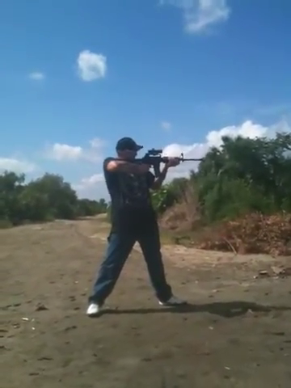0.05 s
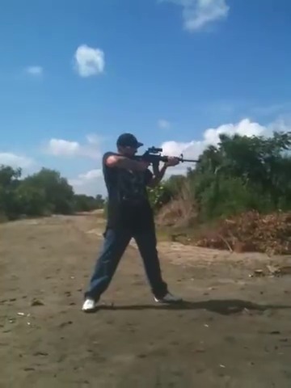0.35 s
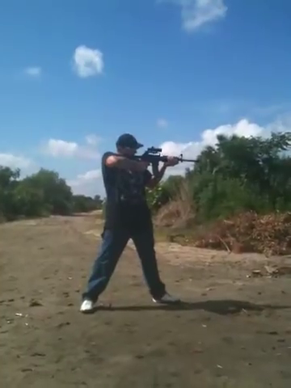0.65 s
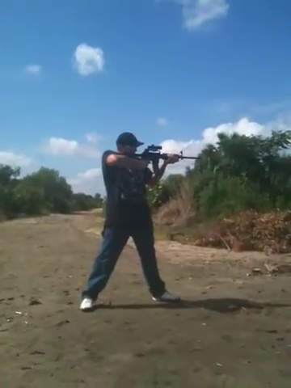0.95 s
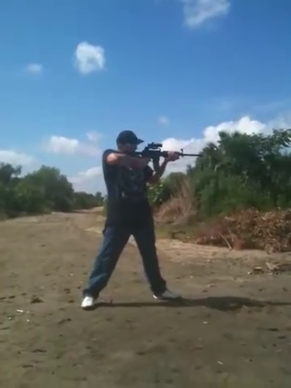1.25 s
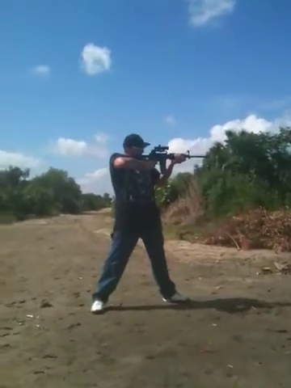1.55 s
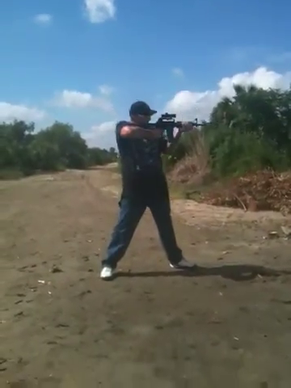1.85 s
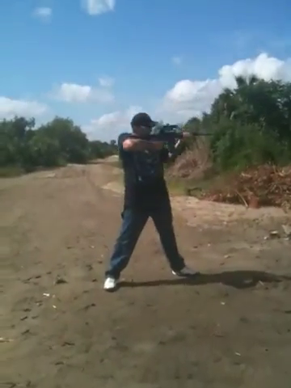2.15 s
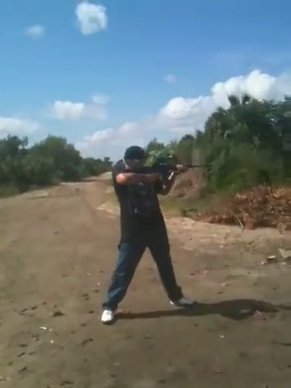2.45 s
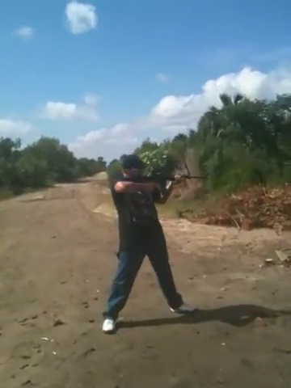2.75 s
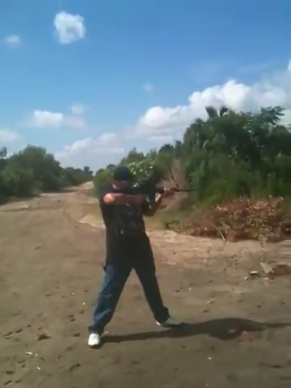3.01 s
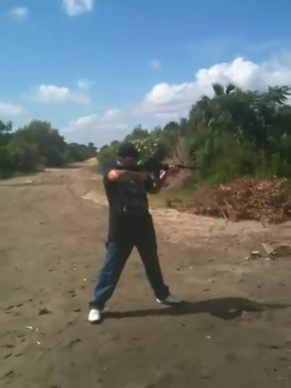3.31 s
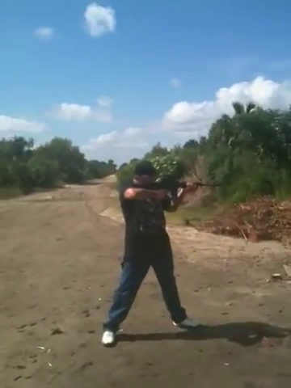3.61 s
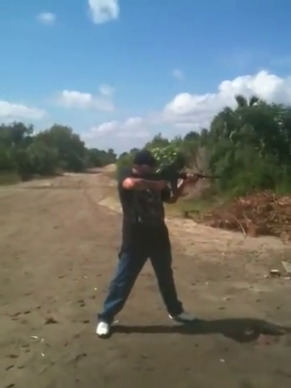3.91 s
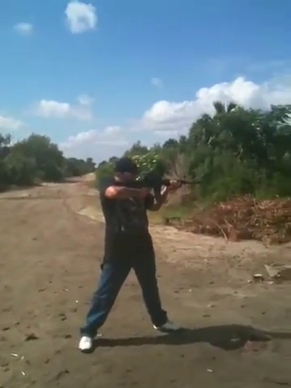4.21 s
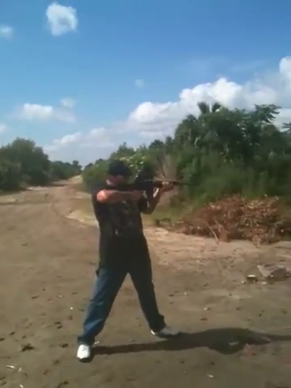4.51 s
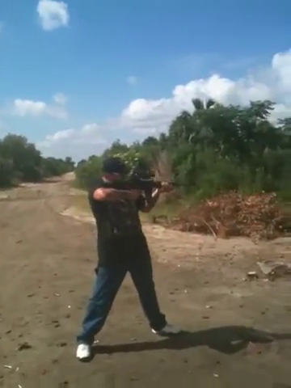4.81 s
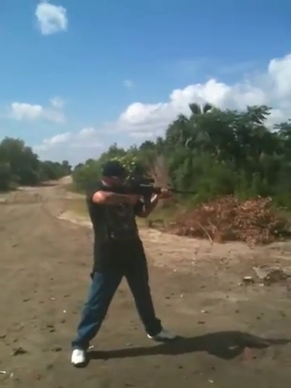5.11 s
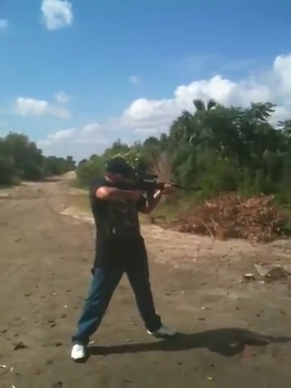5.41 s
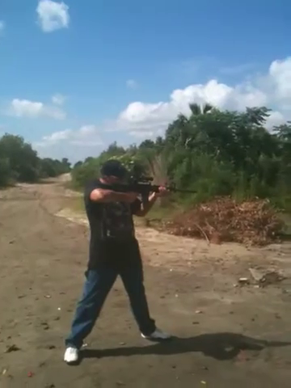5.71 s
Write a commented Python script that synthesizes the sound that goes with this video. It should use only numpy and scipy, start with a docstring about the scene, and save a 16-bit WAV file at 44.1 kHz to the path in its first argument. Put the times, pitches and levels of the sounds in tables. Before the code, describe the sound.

After a fading gunshot echo, two sharp rifle shots crack and roll through distant trees while spent cases tinkle faintly.

```python
"""A rifle shot is already dying away on a dirt range ringed by bushes. A spent case tinkles on the
ground at 0.7 s. At 2.3 s and 4.6 s the rifle fires again: each blast and its scatter from ground and
foliage overload a small microphone, then echoes roll back from the tree line. Between the shots come
cloth rubs and small clicks from bouncing cases and handling; a second case lands at 3.3 s.
Near 5.3 s a thin far whistle arches over the last echoes."""
import sys
import numpy as np
from scipy import signal
from scipy.fft import rfft, irfft
from scipy.io import wavfile

SR = 44100
rng = np.random.default_rng(int(sys.argv[2]) if len(sys.argv) > 2 else 0)


def unload_audio(sound):
    """Save the sound as a 16-bit wav file, at the path given as the first command line argument."""
    columns = np.transpose(np.atleast_2d(sound))
    # keep every value between -1 and 1, then stretch to whole-number steps
    steps = np.round(np.clip(columns, -1, 1) * 32767)
    wavfile.write(sys.argv[1], SR, steps.astype(np.int16))


N = 262836
TIME = np.arange(N) / SR
CUTOFF_HZ = 16000

# rifle shots: (time [s], strength [dB], extra echo boom [dB], tail length [factor])
SHOTS = [(-.378, 6.0, 0.0, .82), (2.298, 0.0, -1.5, 1.02), (4.566, 0.0, 2.0, .98)]
# muzzle blast: (frequency [Hz], relative density [dB])
BLAST_SPECTRUM = [(40, -40.5), (150, -11.5), (450, -5), (800, -0.5), (1600, -1.5), (2300, -0.5), (3300, -7),
                  (6000, -8), (10000, -10.5), (16000, -26)]
# scatter from leaves: (frequency [Hz], relative density [dB])
FOLIAGE_SPECTRUM = [(40, -46.5), (150, -8.5), (400, -2.5), (1000, -7), (2200, -0.5), (3300, -2.5),
                    (5800, -3.5), (9000, -4.5), (12000, -9.5), (16000, -22)]
# returns from banks and tree clumps: (delay [s], centre [Hz])
ECHOES = [(.030, 420), (.042, 215), (.058, 400), (.069, 2000), (.081, 480), (.088, 205.4), (.101, 2000),
          (.111, 639.2), (.134, 230), (.132, 700), (.183, 780), (.191, 1260), (.196, 205), (.203, 704),
          (.226, 704), (.337, 735), (0.346, 1630), (.427, 2080), (.532, 1780), (.544, 780), (0.621, 1860)]
# roll through distant trees: (frequency [Hz], relative density [dB])
TAIL_SPECTRUM = [(30, -50.5), (70, -25.5), (150, -0.5), (400, -5), (800, -6.5), (1400, -7.5), (2200, -4.5),
                 (3200, -6), (6000, -9.5), (9000, -12), (12000, -27.5), (16000, -34)]
# decay of that roll: (frequency [Hz], base t60 [s])
TAIL_T60 = [(250, 1.51), (2000, 1.492), (5000, 1.324), (9000, 1.2), (16000, 1.1)]
# case landing and bouncing: (time [s], impact level [dB], ring level [dB])
CASE_IMPACTS = [(.663, -55, -44.5), (.783, -51, -58)]
# brass case modes, the lower two beating: (frequency [Hz], relative level [dB], t60 [s])
BRASS_MODES = [(11635, -2, .25), (11655, -9, .25), (15100, -4, .17)]
# dry clicks and ticks of cases landing and bouncing, and of handling: (time [s], level [dB], centre [Hz])
CLICKS = [(.892, -52, 13500), (.921, -52, 13500), (1.588, -58, 2200), (1.87, -55, 2800), (1.95, -56, 2800),
          (2.077, -47, 7500), (3.324, -42, 7000), (3.883, -49, 4200), (4.229, -57, 1700),
          (4.259, -50, 2200)]
# cloth rubs as an arm shifts: (peak time [s], level [dB], rise [s], fade [s])
CLOTH_RUBS = [(1.91, -65.5, .19, .25), (4.250, -61, 0.022, 0.018)]
# sleeve friction: (frequency [Hz], relative density [dB])
SLEEVE_SPECTRUM = [(300, -32.5), (900, -6.5), (1500, 0.5), (2300, -4.5), (4000, -9), (9000, -5),
                   (12000, -16), (16000, -22)]
# higher, hissing rub: (frequency [Hz], relative density [dB])
HISS_SPECTRUM = [(1000, -20), (2100, -4), (3200, -10), (4800, -9), (5900, 0), (7000, -9), (8000, -9),
                 (9000, -2), (11000, -8), (13300, -4), (16000, -11)]
# open air: (frequency [Hz], relative density [dB])
AIR_SPECTRUM = [(25, -28), (55, -15.5), (85, -2.5), (160, 0), (400, -3.5), (650, -9), (1500, -17),
                (3000, -19), (6000, -21.5), (16000, -23)]
# microphone port resonances: (centre [Hz], width [Hz], boost [dB])
PORT_RESONANCES = [(754, 200, 4.5), (1303.5, 240, 6), (2156, 350, 7), (5530, 1300, 5)]


def muzzle_blast(blast_db=8.5, blast_t60_s=.15, crack_db=4.0, crack_hz=5500):
    """A sharp crack, then the blast and its bounce off the dirt as one decaying noise."""
    crack = sum(from_db(db + crack_db) * burst(s, crack_hz, width=1.2, t60_s=.054) for s, db, *_ in SHOTS)
    envelope = after_shots(lambda age_s: decay(age_s, blast_t60_s))
    return crack + from_db(blast_db) * coloured(BLAST_SPECTRUM) * envelope


def foliage(level_db=-5.5, near_s=.1, loss_db=22.5):
    """Leaves and twigs throw the crack back as a bright, grainy wash."""
    wash = after_shots(lambda age_s: (age_s >= 0) * from_db(level_db + path_db(age_s, near_s, loss_db)))
    return wash * coloured(FOLIAGE_SPECTRUM) * flutter(rate_hz=500, depth_db=1.0)


def echoes(level_db=3.0, tilt_db_per_octave=-1.47, blur_per_s=2.6, boom_below_hz=450):
    """Banks and trees return the blast, favouring the bass; far echoes are weaker, softer and longer."""
    returns = 0
    for delay_s, hz in ECHOES:
        tilt_db = tilt_db_per_octave * np.log2(hz / boom_below_hz)
        echo_db = level_db + path_db(delay_s, near_s=.078, loss_db=14) + tilt_db
        blur = np.hypot(1, blur_per_s * delay_s)
        rise_s = .002 + .017 * delay_s
        for shot_s, shot_db, boom_db, _ in SHOTS:
            gain = from_db(echo_db + shot_db + boom_db * (hz < boom_below_hz)) / np.sqrt(blur)
            returns += gain * burst(shot_s + delay_s, hz, width=.7, t60_s=.062 * blur, rise_s=rise_s)
    return filtered(returns, 160, "high", order=4)


def far_tail(level_db=-24.0):
    """The report rolls unevenly through distant trees; the treble dies first."""
    spectrum = rfft(coloured(TAIL_SPECTRUM))
    hz = np.arange(len(spectrum)) * SR / N
    band_hz = 2 ** (np.round(2 * np.log2(np.clip(hz, 250, CUTOFF_HZ))) / 2)   # half octaves
    roll = 0
    for centre_hz in np.unique(band_hz):
        band = irfft(spectrum * (band_hz == centre_hz), N) * flutter(rate_hz=49, depth_db=2.5)
        t60_s = at_hz(TAIL_T60, centre_hz)
        roll += band * sum(from_db(db) * decay(TIME - s, length * t60_s) for s, db, _, length in SHOTS)
    return from_db(level_db) * roll * flutter(rate_hz=130, depth_db=2.2)


def spent_case(tick_hz=6000, knock_hz=2050, knock_db=-11):
    """A brass case ticks and knocks on the ground and rings as it springs clear."""
    tinkle = 0
    for start_s, impact_db, ring_db in CASE_IMPACTS:
        age_s = TIME - start_s
        ring = sum(from_db(db) * decay(age_s, t60_s) * np.sin(2 * np.pi * hz * age_s)
                   for hz, db, t60_s in BRASS_MODES)
        tick = burst(start_s, tick_hz, width=1.0, t60_s=.035)
        knock = from_db(knock_db) * burst(start_s, knock_hz, width=.2, t60_s=.05)
        tinkle += from_db(impact_db) * (tick + knock) + from_db(ring_db) * ring
    return tinkle


def small_clicks(t60_cycles=80):
    """Small dry clicks and ticks: spent cases landing and bouncing, and handling."""
    return sum(from_db(db) * burst(s, hz, width=.63, t60_s=t60_cycles / hz, order=1)
               for s, db, hz in CLICKS)


def rubs():
    """Faint cloth rubs and one higher, hissing rub as the grip shifts."""
    cloth = sum(swell(*rub) for rub in CLOTH_RUBS) * coloured(SLEEVE_SPECTRUM)
    hiss = swell(peak_s=3.37, level_db=-61.5, rise_s=.16, fade_s=.30) * coloured(HISS_SPECTRUM)
    return (cloth + hiss) * flutter(rate_hz=270, depth_db=1.0)


def whistle(top_s=5.28, top_hz=4080, turn_s=.1, rise_hz_per_s=9800, fall_hz_per_s=4550):
    """A faint tone climbs, turns over and sinks more slowly as it fades."""
    from_top_s = TIME - top_s
    slope_hz_per_s = np.where(from_top_s < 0, rise_hz_per_s, fall_hz_per_s)
    arch_hz = top_hz - slope_hz_per_s * (np.hypot(from_top_s, turn_s) - turn_s)
    pitch_hz = np.maximum(arch_hz, 0) * flutter(rate_hz=300, depth_db=.1)
    envelope = swell(peak_s=5.29, level_db=-66, rise_s=.13, fade_s=.14)
    return envelope * flutter(rate_hz=30, depth_db=3.0) * np.sin(2 * np.pi * np.cumsum(pitch_hz) / SR)


def open_air(level_db=-68.6):
    """Quiet, steady noise, mostly low."""
    return from_db(level_db) * coloured(AIR_SPECTRUM)


def after_shots(envelope):
    """Sum of one envelope of age per shot, scaled by its strength."""
    return sum(from_db(db) * envelope(TIME - s) for s, db, *_ in SHOTS)


def path_db(delay_s, near_s, loss_db):
    """Reflection level: full out to near_s, then loss_db less per doubling of delay."""
    return -loss_db * np.log2(np.maximum(delay_s / near_s, 1))


def burst(start_s, centre_hz, width, t60_s, rise_s=.00022, order=2):
    """Decaying band noise; width is roughly a fraction of the centre frequency."""
    size = SR // 4
    edges_hz = np.clip([centre_hz / (1 + width / 2), centre_hz * (1 + width / 2)], 20, .45 * SR)
    envelope = decay(TIME[:size], t60_s) * (1 - np.exp(-TIME[:size] / rise_s))
    pulse = unit_rms(filtered(rng.standard_normal(size), edges_hz, "band", order)) * envelope
    index = round(start_s * SR) + np.arange(size)
    heard = (index >= 0) & (index < N)
    track = np.zeros(N)
    track[index[heard]] = pulse[heard]
    return track


def coloured(spectrum):
    """Steady noise of a given spectrum, rms 1."""
    hz = np.arange(N // 2 + 1) * SR / N
    return unit_rms(irfft(rfft(rng.standard_normal(N)) * from_db(at_hz(spectrum, hz)), N))


def decay(age_s, t60_s):
    """Silence, then exponential decay from age zero."""
    return (age_s >= 0) * from_db(-60 * np.clip(age_s / t60_s, 0, 10))


def swell(peak_s, level_db, rise_s, fade_s):
    """Bell-shaped gain, separate widths before and after the peak."""
    age_s = TIME - peak_s
    width_s = np.where(age_s < 0, rise_s, fade_s)
    return from_db(level_db) * np.exp(-.5 * np.minimum((age_s / width_s) ** 2, 20))


def flutter(rate_hz, depth_db):
    """Randomly wandering gain."""
    return from_db(depth_db * np.interp(TIME * rate_hz, np.arange(N), rng.standard_normal(N)))


def filtered(x, hz, kind, order):
    """Butterworth filter."""
    return signal.sosfilt(signal.butter(order, hz, kind, fs=SR, output="sos"), x + 1e-18)


def at_hz(table, hz):
    """Table lookup on a log-frequency axis."""
    known_hz, values = np.transpose(table)
    return np.interp(np.log(np.maximum(hz, 1)), np.log(known_hz), values)


def unit_rms(x):
    """Scale to rms 1."""
    return x / np.sqrt(np.mean(x ** 2) + 1e-20)


def from_db(db):
    """Decibels to gain."""
    return 10 ** (np.asarray(db) / 20)


def scene():
    """Shots, echoes and small sounds over open air, mono."""
    shots = muzzle_blast() + foliage() + echoes() + far_tail()
    return (shots + open_air() + whistle() + spent_case() + small_clicks() + rubs())[None]


def record(dry, ceiling=.49, knee=5, bass_hz=110, bass_db=-5.5):
    """Small microphone: the port rings, the input clips, the bass is shelved down, the top is cut."""
    for hz, width_hz, boost_db in PORT_RESONANCES:
        resonance = signal.lfilter(*signal.iirpeak(hz, hz / width_hz, fs=SR), dry)
        dry = dry + (from_db(boost_db) - 1) * resonance
    clipped = dry / (1 + np.abs(dry / ceiling) ** knee) ** (1 / knee)
    thinned = clipped + (from_db(bass_db) - 1) * filtered(clipped, bass_hz, "low", order=1)
    lowpass = signal.firwin(161, CUTOFF_HZ, fs=SR, window="blackman")
    return signal.fftconvolve(thinned, lowpass[None], "same")


dry = scene()
out = record(dry)
unload_audio(out)
```